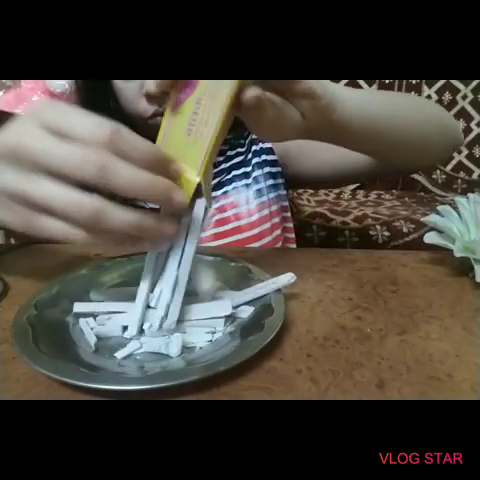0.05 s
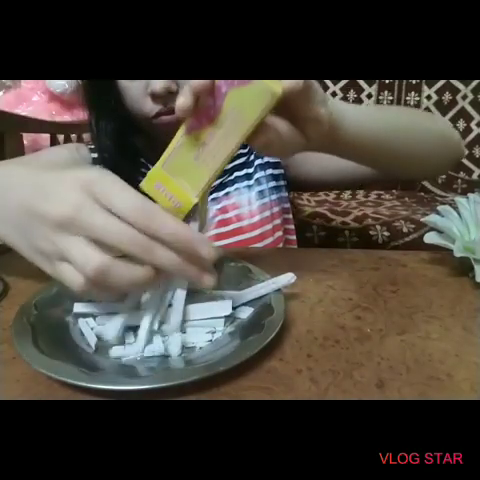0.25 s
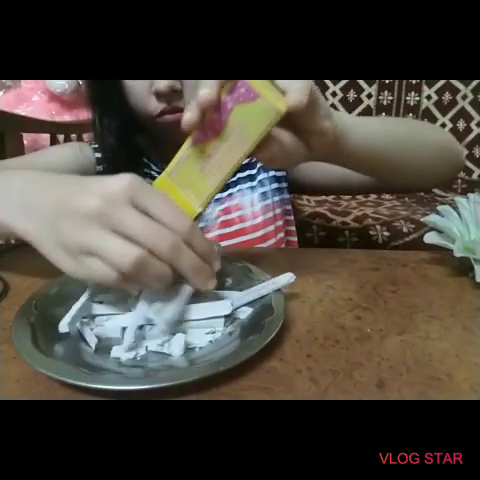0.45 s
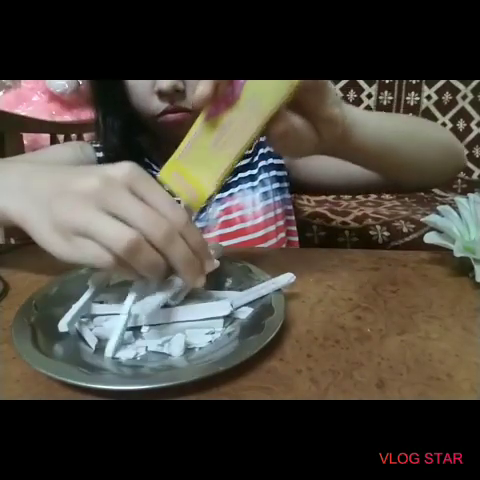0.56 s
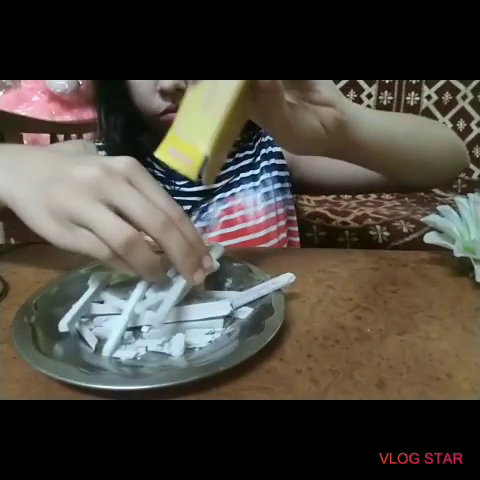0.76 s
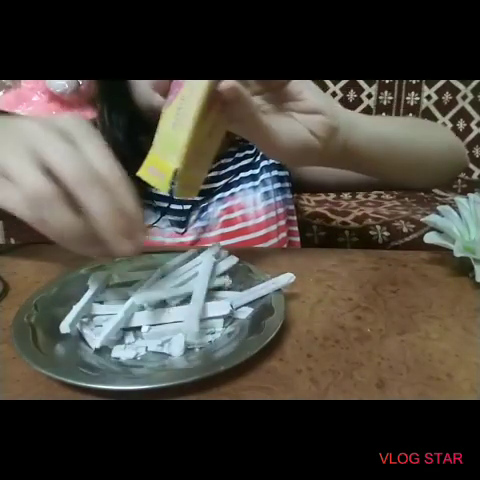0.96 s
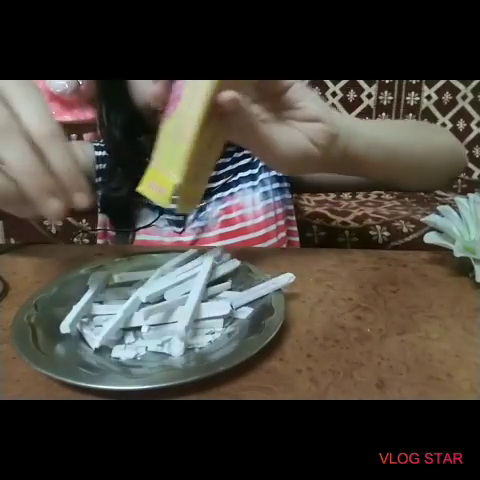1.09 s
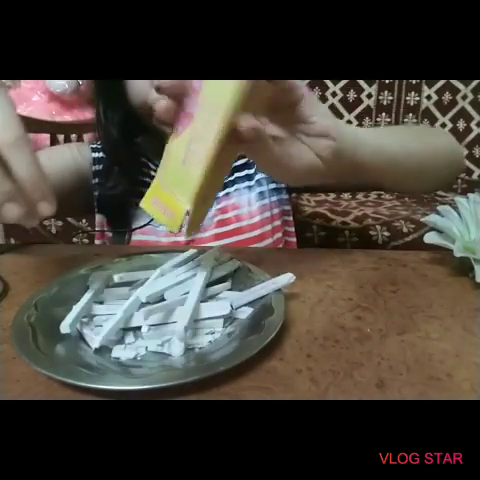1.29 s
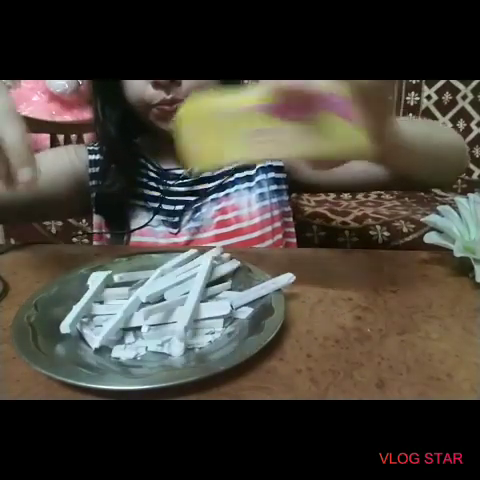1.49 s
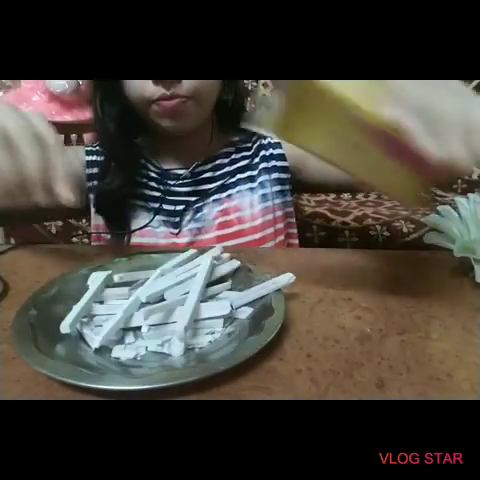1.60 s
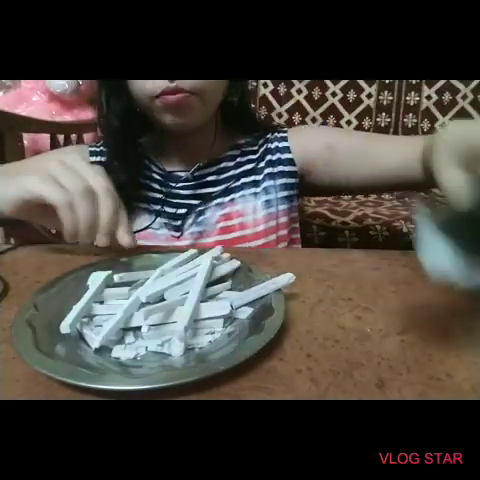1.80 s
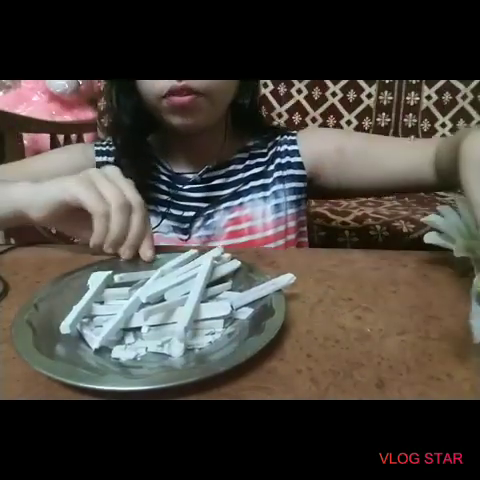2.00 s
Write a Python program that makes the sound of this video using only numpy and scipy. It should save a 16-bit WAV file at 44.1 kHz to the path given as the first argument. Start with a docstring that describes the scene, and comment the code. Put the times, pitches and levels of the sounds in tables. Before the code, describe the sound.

Chalky sticks slide from a cardboard box onto a metal plate: light ticks at first, then a sharp burst of clacks from 0.3 to 0.45 seconds, with brief damped ringing, low table thuds and a dry rustle. Sparse taps follow, a softer tumble around 0.8 to 1.0, and last clicks near 1.1. Afterwards only faint room noise remains, with a slight low rumble near 1.95. Close, small room.

```python
"""Chalky slate sticks slide out of a cardboard box and clatter onto a pile in a steel plate on a table.
Each contact is a coloured noise click with short stick tones, and it rings the damped modes of the plate.
Lower decaying sines are thuds on the table; sparse touches exciting many resonators are tumbling sticks.
Filtered noise gives the rustle of rubbing, a faint room noise and a low rumble.
A small room, heard from close by, adds early echoes and a tail that decays band by band."""
import sys
import numpy as np
from scipy import signal
from scipy.fft import rfft, irfft
from scipy.io import wavfile

SR = 44100
rng = np.random.default_rng(int(sys.argv[2]) if len(sys.argv) > 2 else 0)


def to_wav(s):
    """Save 16-bit WAV."""
    ch = np.atleast_2d(s).T  # columns
    pcm = np.round(np.clip(ch, -1, 1) * 32767)  # PCM
    wavfile.write(sys.argv[1], SR, pcm.astype(np.int16))


N = 90404   # length in samples
TIME = np.arange(N) / SR   # s
GRID_HZ = np.fft.rfftfreq(2048, 1 / SR) + 1   # the offset avoids log(0)
HALVES = np.array([[.5], [-.5]])   # shares a left-right difference between the two channels


def from_db(db):
    """Logarithmic level: decibels to amplitude gain."""
    return 10 ** (np.asarray(db) / 20)


def rms_one(x):
    """Power normalisation: scale to rms 1."""
    return x / np.sqrt(np.mean(x ** 2) + 1e-20)


def energy_one(x):
    """Energy normalisation: scale each channel to energy 1."""
    return x / np.sqrt(np.sum(x ** 2, axis=-1, keepdims=True) + 1e-20)


def at_hz(points, hz):
    """Logarithmic pitch: interpolate a table on a log-frequency axis."""
    f, value = np.transpose(points)
    return np.interp(np.log(hz), np.log(f), value)


def level(curve):
    """Amplitude envelope: gain over time from (t/s, level/dB) points."""
    return from_db(np.interp(TIME, *np.transpose(curve)))


def panned(pan_db):
    """Interaural level difference: left and right gains of constant power."""
    return rms_one(from_db(HALVES * pan_db))


def through(x, response):
    """Linear time-invariant system: convolve with its response, at most N samples long."""
    return signal.fftconvolve(np.atleast_2d(x), np.atleast_2d(response), axes=-1)[:, :N]


def causal(gain_db):
    """Minimum phase: fold the cepstrum to get a causal click with the given spectrum."""
    cepstrum = irfft(np.log(from_db(gain_db)))
    fold = 1 + np.sign(np.fft.fftfreq(cepstrum.shape[-1]))
    return irfft(np.exp(rfft(cepstrum * fold)))


def coloured(x, spectrum):
    """Spectral shaping: weight a signal's spectrum by a table, then scale to rms 1."""
    hz = np.fft.rfftfreq(N, 1 / SR) + 1
    return rms_one(irfft(rfft(x) * from_db(at_hz(spectrum, hz)), N))


def clicks(s, gain):
    """Impulsive excitation: one impulse at each time."""
    return np.bincount((np.abs(s) * SR).astype(int), gain, N)[:N]


def ring(x, hz, t60):
    """Damped resonator: a unit click sets a sine of height 1 ringing."""
    r = from_db(-60 / (t60 * SR))   # decay per sample
    w = 2 * np.pi * hz / SR
    return signal.lfilter([0, np.sin(w)], [1, -2 * r * np.cos(w), r * r], x + 1e-18)


# spectrum of the room noise: (f/Hz, relative level/dB)
FLOOR_COLOUR = [(22, -41), (40, -12.5), (64, 4), (120, -6.5), (260, -8.5), (500, -22), (820, -27.5),
                (1700, -33.5), (6400, -40.5), (7900, -52), (10500, -44)]
FLOOR_DB, FLOOR_PAN_DB = -51.5, -1.5
# a low rumble that swells twice: (t/s, level/dB)
RUMBLE_LEVEL = [(1.44, -67.5), (1.5, -61.5), (1.7, -57), (1.75, -77.5), (1.87, -63), (1.95, -49),
                (2.05, -72)]
RUMBLE_HZ, RUMBLE_WIDTH_HZ = 59.5, 22


def background():
    """Stationary noise: partly correlated room noise, plus band-passed noise as a low rumble."""
    air = coloured(rng.standard_normal((2, N)) + rng.standard_normal(N), FLOOR_COLOUR)
    edges_hz = [RUMBLE_HZ - RUMBLE_WIDTH_HZ / 2, RUMBLE_HZ + RUMBLE_WIDTH_HZ / 2]
    band = signal.butter(2, edges_hz, "band", fs=SR, output="sos")
    # one second of run-in lets the filter settle
    rumble = rms_one(signal.sosfilt(band, rng.standard_normal(N + SR))[SR:])
    return from_db(FLOOR_DB) * panned(FLOOR_PAN_DB) * air + level(RUMBLE_LEVEL) * rumble


# reverberation time of the room: (f/Hz, t60/s)
ROOM_DECAY = [(120, 0.39), (300, 1), (700, 0.33), (2000, 0.26), (5000, 0.39), (13000, 0.056)]
EARLY_S, FIRST_ECHO_S = 0.003, 0.00072   # decay constant of the early echoes; middle of the onset ramp


def room():
    """Reverberation: quick echoes off the table and nearby things, and a tail that dies band by band."""
    t = TIME[:SR]
    white = rfft(rng.standard_normal((2, SR)))
    hz = np.arange(SR // 2 + 1) + 1
    octave = np.round(np.log2(hz)).clip(6, 14)
    tail = 0
    for k in np.unique(octave):
        decay = from_db(-60 * t / at_hz(ROOM_DECAY, 2 ** k))
        tail = tail + irfft(white * (octave == k), SR) * decay
    onset = np.clip(t / FIRST_ECHO_S - .5, 0, 1)
    early = rng.standard_normal((2, SR)) * np.exp(-t / EARLY_S)
    return energy_one(early * onset), energy_one(tail * onset)


# rubbing of cardboard, sticks and hand: (t/s, level/dB)
RUB_LEVEL = [(0, -46), (.11, -47.5), (.18, -55.5), (.22, -47.5), (.29, -49.5), (.44, -34.5), (.68, -59),
             (1.0, -62), (1.2, -61.5), (1.58, -72), (1.65, -62.5), (1.8, -67.5), (1.9, -60), (1.97, -71.5),
             (2.0, -57)]
# spectrum of the rubbing: (f/Hz, relative level/dB)
RUB_SPECTRUM = [(200, 4.5), (700, -3), (2200, -1), (3600, -3), (6400, -8.5), (7900, -21.5), (10500, -10),
                (15500, -17.5)]
RUB_GRAINS_PER_S, RUB_GRAIN_SHARE = 2100, 0.38


def rubbing():
    """Dry friction: fine hiss with small catches in it."""
    grains = rms_one((rng.random(N) < RUB_GRAINS_PER_S / SR) * rng.standard_normal(N))
    friction = rng.standard_normal((2, N)) + RUB_GRAIN_SHARE * grains
    return level(RUB_LEVEL) * coloured(friction, RUB_SPECTRUM)


# weight landing on the table, its pitch set by where it lands: (t/s, relative level/dB, starting f/Hz)
TABLE_THUDS = [(0.07, -23.5, 135), (0.2, -35.5, 174), (0.255, -28, 150), (0.311, -30, 150),
               (0.382, -23.5, 136), (0.422, -26.5, 154.7), (0.443, -20, 136.4), (0.535, -24.5, 144.2),
               (0.574, -29.5, 146.7), (0.611, -35.5, 149), (.815, -29, 150), (0.855, -25.5, 149.7),
               (0.903, -30.5, 128), (0.956, -25, 132), (0.983, -28, 165.5), (1.035, -28.5, 134.8),
               (1.137, -35, 171.2), (1.176, -37, 154.4), (1.239, -46.5, 161.5)]
THUD_DB, THUD_PUSH_S, THUD_PAN_DB = 7.5, 0.0015, -17
THUD_T60_S, THUD_SAG_PER_S = 0.11, 1   # the pitch sinks as the plate settles
THUD_LOW_CUT_HZ = 96   # the table radiates little deep bass


def thuds():
    """Damped oscillation: each push sets the plate rocking on the table, at a sinking pitch."""
    out, t = np.zeros(N + SR), TIME[:SR // 4]
    envelope = (1 - np.exp(-t / THUD_PUSH_S)) * np.exp(-np.log(1000) * t / THUD_T60_S)
    for s, db, hz in TABLE_THUDS:
        start = int(s * SR)
        phase = 2 * np.pi * np.cumsum(hz * np.exp(-THUD_SAG_PER_S * t)) / SR
        out[start:start + len(t)] += from_db(db + THUD_DB) * envelope * np.sin(phase)
    low_cut = signal.butter(2, THUD_LOW_CUT_HZ, "high", fs=SR, output="sos")
    return panned(THUD_PAN_DB) * signal.sosfilt(low_cut, out[:N])


# sticks tumbling and scraping over each other: (start t/s, length t/s, level/dB)
TUMBLE_SPILLS = [(0.318, 0.077, -36.5), (0.383, 0.064, -32.5), (0.465, 0.084, -45), (0.839, 0.047, -49.5),
                 (0.942, 0.12, -45)]
# stereo place of the clatter and the plate: (f/Hz, left-right level/dB)
PAN_BY_PITCH = [(200, 0.5), (750, -4), (1250, -4.5), (2000, 0), (3400, -0.5), (6200, -7.5), (8000, -1.5),
                (11000, 10), (15000, 2)]
# colour of cracks and tumbling: (f/Hz, relative level/dB)
CRACK_COLOUR = [(30, -24), (100, -0.5), (250, 3), (450, 5), (1100, 4.5), (1430, 0), (1800, 7), (2300, 3),
                (2900, -7), (3500, -10.5), (4100, -8.5), (5000, -9.5), (6600, -7), (7800, -16),
                (10000, -10), (12500, -12), (16000, -25.5)]
TUMBLE_RISE_S, TUMBLE_TOUCHES_PER_S, TUMBLE_SIZE_DB, TUMBLE_RING_CYCLES = 0.0087, 700, 7.5, 54


def tumbling(count=28):
    """Random excitation of resonators: small uneven touches; each spill starts quickly and thins out."""
    size = from_db(TUMBLE_SIZE_DB * np.minimum(rng.exponential(1, N), 2))
    touches = (rng.random(N) < TUMBLE_TOUCHES_PER_S / SR) * size
    rattle = 0
    for hz in np.geomspace(400, 14000, count):   # sticks of all lengths
        force = touches * (rng.standard_normal(N) + .5 * rng.standard_normal((2, N)))
        tone = ring(force, hz, TUMBLE_RING_CYCLES / hz)
        rattle = rattle + panned(at_hz(PAN_BY_PITCH, hz)) * hz * tone
    envelope = 0
    for s, length, db in TUMBLE_SPILLS:
        rise = np.clip((TIME - s) / TUMBLE_RISE_S, 0, 1)
        fall = np.sqrt(np.clip(1 - (TIME - s) / length, 0, 1))
        envelope = envelope + from_db(db) * rise * fall
    return envelope * coloured(rattle, CRACK_COLOUR)


# sticks that bounce clear and ring: (t/s, f/Hz, level/dB, t60/s, left-right level/dB)
CLEAR_RINGS = [(0.3117, 6085, -19.5, 0.11, -18), (.3822, 3494, -25.5, 0.26, -18),
               (.4125, 4850, -16, 0.059, -15), (0.5466, 2038, -29.5, 0.11, -3),
               (1.11, 4400, -34.5, 0.024, -13)]


def stick_rings():
    """Free vibration: a stick that bounces clear sounds its own note."""
    out = 0
    for s, hz, db, t60, pan_db in CLEAR_RINGS:
        out = out + panned(pan_db) * ring(clicks([s], [from_db(db)]), hz, t60)
    return out


# centre frequencies of the body, clack and snap of a contact: (f/Hz)
REGISTER_CENTRES = [810, 2250, 6150]


def force_db(registers_db, hz):
    """Contact spectrum: relative strength at a given pitch, between the three registers."""
    return np.interp(np.log(hz), np.log(REGISTER_CENTRES), registers_db)


# sticks hitting the pile and the plate: (t/s, body, clack and snap relative level/dB)
STICK_CONTACTS = [(0.067, -52, -36, -30), (.071, -35.5, -33, -42), (0.0937, -70, -42, -65),
                  (.193, -34.5, -26.5, -32.5), (.225, -46, -54, -44), (.260, -44.5, -33, -30.5),
                  (.2647, -40.5, -31, -45), (0.291, -44, -37, -44), (0.3125, -18, -12, -13),
                  (0.3206, -17.5, -39, -31), (0.358, -37, -22, -25), (0.3822, -22.5, -17.5, -19),
                  (0.388, -27.5, -38, -18.5), (0.4118, -24.5, -21, -18), (.424, -21, -24, -25),
                  (0.438, -45, -27, -22.5), (.472, -50, -78, -30.5), (0.492, -26.5, -38.5, -55),
                  (0.5466, -33, -25.5, -32.5), (.553, -26, -38.5, -36), (.614, -37.5, -38.5, -38.5),
                  (0.731, -43.5, -43.5, -49), (0.8198, -33, -37.5, -42), (0.853, -55, -39, -51),
                  (0.859, -37.5, -47, -34), (.869, -33.5, -34, -50), (0.913, -31, -30, -38),
                  (0.942, -34.5, -25.5, -28), (.956, -36.5, -34, -45), (0.974, -35, -42, -28.5),
                  (0.979, -23.5, -23, -32), (1.109, -37.5, -35, -39.5), (1.135, -36.5, -37.5, -38),
                  (1.141, -52.5, -36.5, -41.5)]
# modes of the plate, damped by its load: (f/Hz, relative level/dB, t60/s)
PLATE_MODES = [(441.9, -8, 0.25), (475, -17.5, 0.4), (613, -21, 0.3), (817.3, -6.5, 0.13),
               (908, -18.5, 0.11), (1061, -13, 0.049), (1747, -11, 0.14), (1750, -6.5, 0.16),
               (2050, -16.5, 0.12), (2363, -28, 0.26), (2920, -25.5, 0.42), (3475, -11, 0.11),
               (4397, -21, 0.38), (4875, -20, 0.11), (5213, -25.5, 0.34), (5650, -26, 0.25)]
PLATE_DB, PLATE_LAG_CYCLES = -2, 0.21
STRIKE_SPREAD_DB = 1   # standard deviation from strike to strike, for plate and stick modes
PLATE_FOLLOWS_BODY = 0.32   # a stick that only taps another stick has little body and hardly rings the plate


def plate():
    """Modal superposition: contacts ring each mode unevenly; each mode reaches one side a little later."""
    rows, out = np.array(STICK_CONTACTS), 0
    spread = rng.standard_normal((len(rows), len(PLATE_MODES)))
    tap_db = PLATE_FOLLOWS_BODY * np.minimum(rows[:, 1] - rows[:, 2], 0)
    for k, (hz, db, t60) in enumerate(PLATE_MODES):
        contact_db = np.array([force_db(row[1:], hz) for row in rows])
        strike_db = contact_db + tap_db + db + STRIKE_SPREAD_DB * spread[:, k]
        strikes = from_db(strike_db) * rng.choice([-1, 1], len(rows))
        tone = ring(clicks(rows[:, 0], strikes), hz, t60)
        later = np.interp(TIME - PLATE_LAG_CYCLES / hz, TIME, tone)
        sides = np.array([tone, later])[::(-1) ** k]   # the late side alternates
        out = out + panned(at_hz(PAN_BY_PITCH, hz)) * sides
    return from_db(PLATE_DB) * out


# modes of a stick lying in the pile: (mean f/Hz, relative level/dB)
PILE_MODES = [(1080, -4), (1950, -11), (3480, -4.5), (4830, -5.5)]
STICK_T60_S, STICK_PITCH_SPREAD = 0.015, 0.038   # the spread is a standard deviation of log pitch


def clinks():
    """Damped bar modes: the struck stick rings until the pile damps it, each at a slightly random pitch."""
    out, t = np.zeros((2, N + SR)), TIME[:SR // 10]
    for s, *registers_db in STICK_CONTACTS:
        start = int(s * SR)
        for mean_hz, db in PILE_MODES:
            detune, strength, lead = rng.standard_normal(3)
            hz = mean_hz * np.exp(STICK_PITCH_SPREAD * detune)
            strike_db = force_db(registers_db, hz) + db + STRIKE_SPREAD_DB * strength
            envelope = from_db(strike_db - 60 * t / STICK_T60_S)
            tone = np.sin(2 * np.pi * hz * t + lead * HALVES)   # phase differs between the sides
            out[:, start:start + len(t)] += panned(at_hz(PAN_BY_PITCH, hz)) * envelope * tone
    return out[:, :N]


SMEAR_S = 0.00079   # decay constant


def smeared_click(t):
    """Phase dispersion: a click of nearly flat spectrum, spread over about a millisecond by the pile."""
    spectrum = rfft(rng.standard_normal(len(t)) * np.exp(-t / SMEAR_S))
    return irfft(spectrum / np.abs(spectrum), len(t)) * (t < t[-1] / 2)


BOUNCES_PER_S, BOUNCE_S, BOUNCE_DB = 200, 0.039, -4   # BOUNCE_S is a decay constant
BOUNCE_CUT_HZ = 3800   # rebounds are softer than the first touch


def bounces():
    """Inelastic rebound: a dying run of tiny, uneven, duller touches."""
    t = TIME[:SR // 10]
    touches = (rng.random(len(t)) < BOUNCES_PER_S / SR) * rng.uniform(-1.1, 1, len(t))
    touches = signal.sosfilt(signal.butter(1, BOUNCE_CUT_HZ, fs=SR, output="sos"), touches)
    return from_db(BOUNCE_DB) * touches * np.exp(-t / BOUNCE_S)


CRACK_DB, CHATTER_S, CHATTER_DB = 24.5, 0.0064, 2   # CHATTER_S is a decay constant


def cracks():
    """Impact excitation: a click, chatter and rebounds, coloured by how the stick lands."""
    out, t = np.zeros((2, N + SR)), TIME[:SR // 10]
    pan = from_db(HALVES * at_hz(PAN_BY_PITCH, GRID_HZ))
    pan_power_db = 10 * np.log10(pan ** 2 / np.mean(pan ** 2, axis=0))   # constant power at each pitch
    colour_db = at_hz(CRACK_COLOUR, GRID_HZ) + pan_power_db
    for s, *registers_db in STICK_CONTACTS:
        chatter = energy_one(rng.standard_normal((2, len(t))) * np.exp(-t / CHATTER_S))
        touch = from_db(CHATTER_DB) * chatter + smeared_click(t) + bounces()
        crack = through(touch, causal(colour_db + force_db(registers_db, GRID_HZ)))
        start = int(s * SR)
        out[:, start:start + crack.shape[1]] += crack
    return from_db(CRACK_DB) * out[:, :N]


ROOM_DB, EARLY_DB, THUD_ROOM_DB = -7.5, -0.5, -4.5


def scene():
    """Superposition: clatter and thuds in the room, over the rubbing and the background."""
    early, tail = room()
    clatter = cracks() + clinks() + tumbling()
    thud = thuds()
    metal = plate() + stick_rings()
    into_tail = from_db(ROOM_DB) * (clatter + .5 * metal) + from_db(THUD_ROOM_DB) * thud
    echoes = from_db(EARLY_DB) * through(clatter, early) + through(into_tail, tail)
    return clatter + metal + thud + echoes + rubbing() + background()


CUTOFF_HZ = 15800


def record(dry):
    """Saturation and band limiting: the highest peaks are rounded and the top is cut."""
    top_cut = signal.ellip(10, .2, 80, CUTOFF_HZ, fs=SR, output="sos")
    return signal.sosfilt(top_cut, np.tanh(dry))


dry = scene()
out = record(dry)
to_wav(out)
```